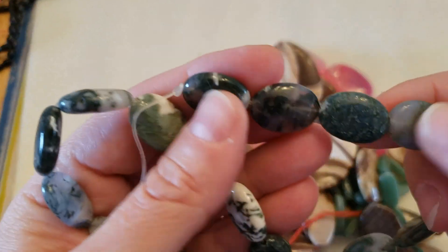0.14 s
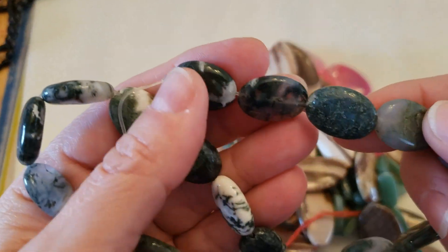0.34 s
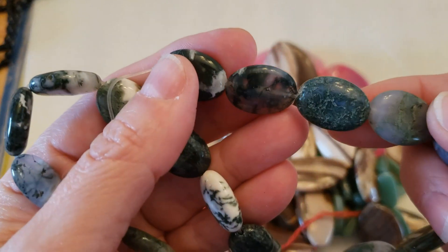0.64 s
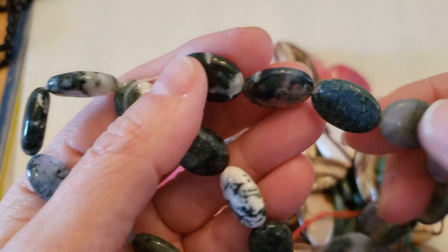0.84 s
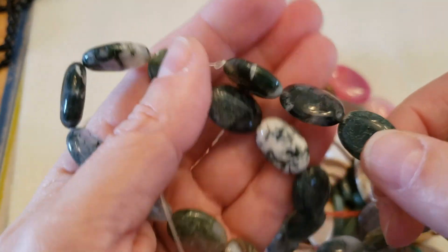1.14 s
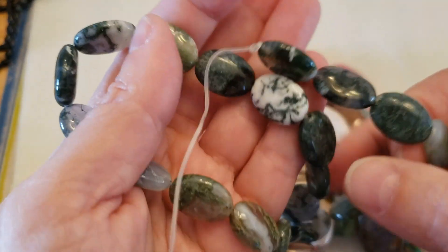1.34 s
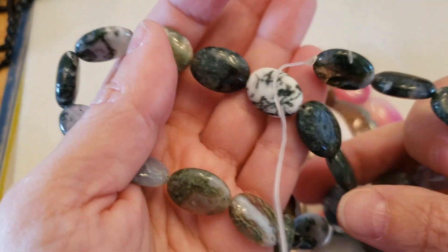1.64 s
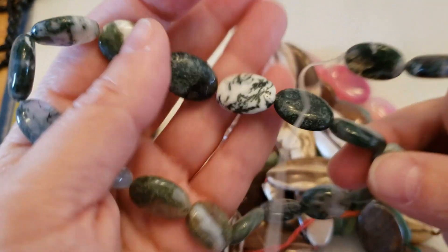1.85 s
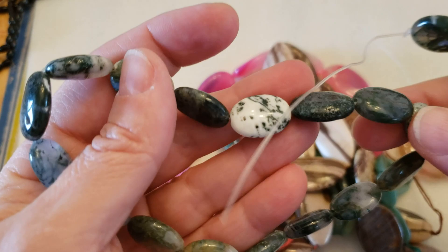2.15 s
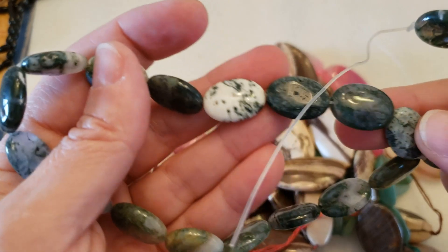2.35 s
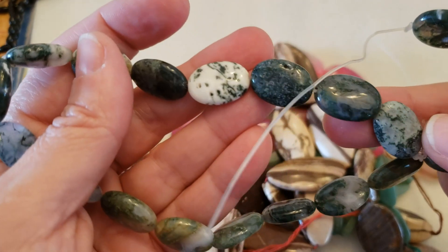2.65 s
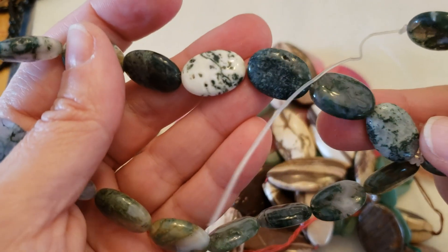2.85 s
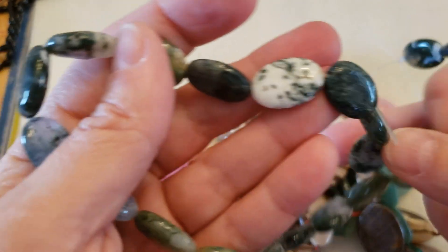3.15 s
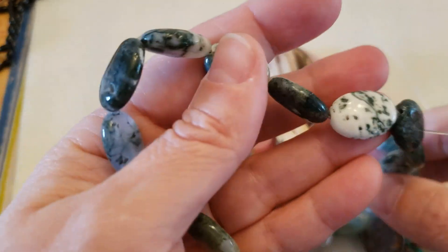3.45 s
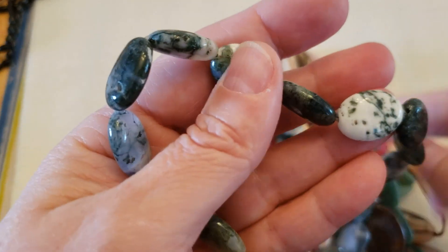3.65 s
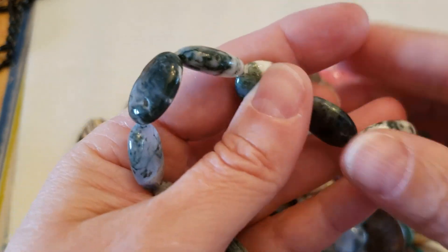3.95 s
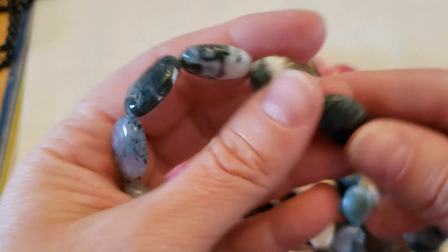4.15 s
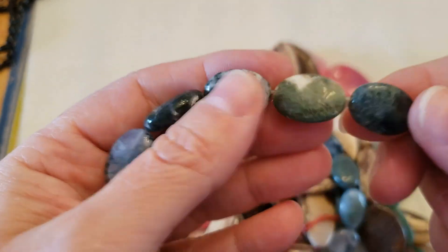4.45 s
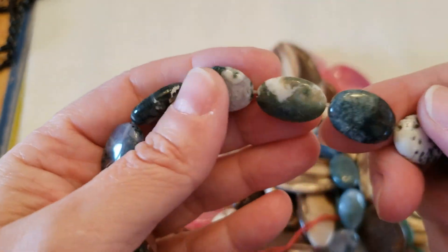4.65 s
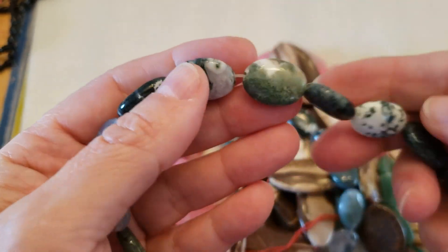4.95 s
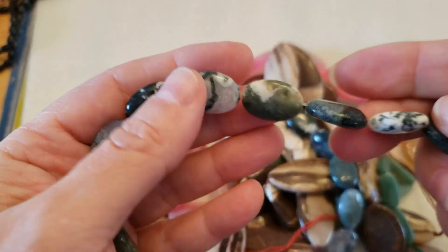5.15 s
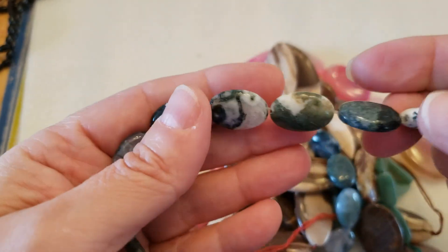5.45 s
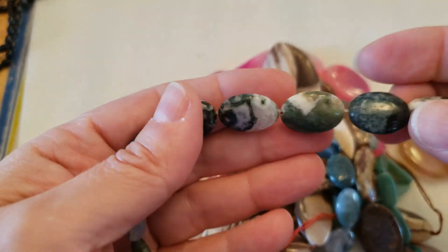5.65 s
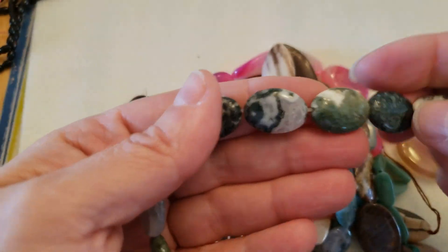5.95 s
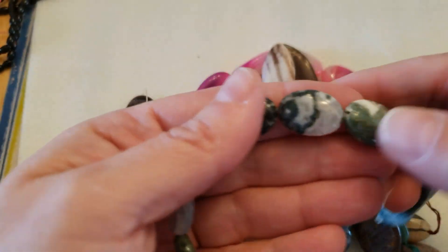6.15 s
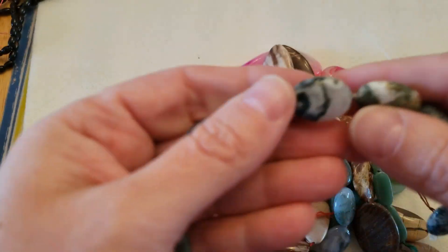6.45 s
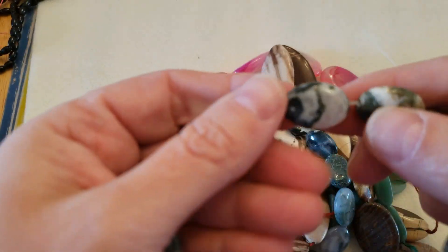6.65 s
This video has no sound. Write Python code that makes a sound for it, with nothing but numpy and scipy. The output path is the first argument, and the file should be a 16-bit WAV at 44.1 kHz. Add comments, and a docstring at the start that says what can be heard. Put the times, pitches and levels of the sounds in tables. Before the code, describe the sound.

Stone beads tick against each other in the fingers, crisp and glassy, with long near-silent gaps. A little past halfway a rapid burst of much louder clacks rattles out as beads drop onto others on a table. Lighter clicks resume, with soft grating and barely audible skin brushing. Close stereo microphone, short indoor reflections, faint wavering low rumble growing slowly.

```python
"""Polished stone beads on a strand tick against each other as hands turn it close to a phone in a small room.
Each contact is a compact impulse with its own colour and a short scattered ring; grating is a train of weak ones.
Once the loose end drops onto a heap of strands on the table: harder impulses that run on from bead to bead.
Brushing skin is swells of band noise. Behind lie a low drone like an engine outside (a wavering sine),
its slowly growing rumble, a boxy hum, a faint electrical whine (thin sines) and still air (coloured noise)."""
import sys
import numpy as np
from scipy import signal
from scipy.fft import rfft, irfft
from scipy.io import wavfile
from scipy.ndimage import uniform_filter1d

SR = 44100
rng = np.random.default_rng(int(sys.argv[2]) if len(sys.argv) > 2 else 0)


def persist_wave(psi):
    """Save psi, clipped to +-1, as 16-bit WAV."""
    counts = np.round(np.clip(psi, -1, 1) * 32767).astype(np.int16)
    wavfile.write(sys.argv[1], SR, np.atleast_2d(counts).T)


N = 299439

# bead meets bead in the hand:
# (time [s], level [dB], body below 4 kHz [dB], edge above 13 kHz [dB], left minus right [dB])
HAND_CLICKS = [(0.047, -39, -3, -30, 13), (0.902, -20.5, -6, 7.5, 5), (0.9874, -31, -2, 7, 5),
               (1.0525, -37.5, -2, -7, -1), (1.1677, -13.5, -12, 3.5, 32), (1.1715, -18.5, -10, 7.5, -34),
               (1.3359, -24.5, -10, 22.5, 15), (1.342, -22, -16, 12, -14), (1.391, -28.5, -15.5, 12.5, 5),
               (1.8119, -37.5, -9, -2, 9), (2.0086, -35, -15, -41, 0), (3.511, -26.5, -12, 8, -16),
               (3.7909, -23.5, -11, -7, -10), (3.939, -36, -2.5, 2.5, -4), (4.1163, -44, 7, -20, 5),
               (4.151, -30.5, -4, -17, 22), (4.2355, -23.5, -6.5, -4, -4), (4.246, -27.5, -6, 5, 21),
               (4.5291, -16, -4.5, -10, 7), (4.546, -20.5, -5.5, 4, 3), (4.6718, -36, -31, -4, 2),
               (4.7875, -31, -12.5, 2, -1), (5.1653, -26, -15.5, 4, -3.5), (5.2654, -32, -8.5, -24, 8),
               (5.285, -20.5, -10.5, 12, 3.5), (5.4856, -40, -8.5, -23.5, 3), (6.0967, -34, -8.5, -10, 6),
               (6.1421, -33.5, -13, -4, -1), (6.1595, -28, -11, 0, 15), (6.194, -17, -19, 3, -4),
               (6.198, -16, -17, -7, 15), (6.2091, -11, -10, 5, 4), (6.217, -24.5, -7.5, -18, 8),
               (6.3995, -34, -15, -22, 4), (6.4255, -21, -7.5, -2, -7), (6.5075, -14.5, -35, -2, -20),
               (6.5118, -26.5, -0.5, 8, 4)]
# beads rub as the strand is drawn through the fingers: (start [s], end [s], rate [ticks/s], middle level [dB])
GRATING_SPELLS = [(0.826, 0.902, 65, -43), (1.682, 1.842, 58, -54.5), (2.023, 2.101, 90, -46.5),
                  (2.956, 3.5, 14, -52.5), (4.019, 4.225, 63, -48), (4.221, 4.257, 210, -38.5),
                  (4.602, 4.856, 20, -49.5), (5.102, 5.202, 30, -50), (6.398, 6.749, 20, -49)]
# colour of a contact between beads held in the fingers: (frequency [Hz], gain [dB])
HELD_COLOUR = [(100, -18), (500, -14), (1000, -22.5), (1600, -17), (2200, -6.5), (2800, -9.5), (3700, -0.5),
               (5000, -2), (6200, -1.5), (7400, -0.5), (8600, -3), (11000, -2.5), (14500, -5),
               (16000, -1.5)]
# beads of the loose end land on the heap:
# (time [s], level [dB], body below 4 kHz [dB], edge above 13 kHz [dB])
LANDINGS = [(3.6219, -1, -8.5, 8), (3.6332, -12, -1, 11), (3.6437, 1.5, -3, 6.5), (3.6562, -5.5, -8.5, 6.5),
            (3.675, -13, -6, 0), (3.6869, -11.5, -4, 10.5), (3.6965, -1, -8.5, 4.5),
            (3.7084, -12, -10.5, 2), (3.7322, -26.5, -9, 14)]
# colour of a contact on the heap, which lies on the table: (frequency [Hz], gain [dB])
HEAP_COLOUR = [(100, -14.5), (450, -21), (700, -26), (1300, -25.5), (1800, -16), (2300, -3.5), (3000, -0.5),
               (4000, 1), (4700, -3.5), (6000, -0.5), (7400, -1), (8800, -6.5), (13000, 1.5), (16000, -3)]
# colour of the room's answer: (frequency [Hz], gain [dB])
ROOM_COLOUR = [(200, 7.5), (1500, 5), (3000, 0.8), (5000, -0.5), (7000, -5.5), (9000, -3), (12000, -4.5),
               (16000, -10)]
# skin brushes over stone and skin:
# (centre time [s], time from centre to a fall by e^2 [s], centre frequency [Hz], level [dB])
BRUSH_STROKES = [(1.053, 0.081, 4700, -79.5), (1.51, 0.18, 14000, -83), (2.04, 0.21, 5760, -81),
                 (3.228, 0.038, 14300, -68.5), (4.129, 0.26, 4500, -80.5), (4.207, 0.235, 295, -70.5),
                 (5.721, 0.056, 13420, -79), (6.468, .07, 14700, -71)]
# pitch of the distant engine: (time [s], firing rate [Hz])
FIRING_RATE = [(0, 63), (1.7, 63), (2.4, 68), (3, 71), (4.2, 74), (5, 74), (6, 72), (6.8, 70)]
# level of the engine's drone as it carries indoors: (time [s], level [dB])
DRONE_LEVEL = [(0, -75), (0.48, -64.5), (0.62, -83.5), (1.33, -74), (1.46, -63.5), (1.8, -74), (2.65, -65),
               (3.3, -61.5), (3.44, -67.5), (3.55, -56.5), (3.98, -62.5), (4.15, -54), (4.93, -68.5),
               (5.3, -65.5), (5.47, -76.5), (5.92, -53.5), (6.42, -53), (6.79, -59)]
# spectrum of the engine's rumble: (frequency [Hz], relative density [dB per Hz])
RUMBLE_SPECTRUM = [(20, -7.5), (33, -6.5), (50, -8.5), (72, 3), (100, -4), (135, -6), (175, 2), (235, -5.5),
                   (300, -8), (380, -20.5), (550, -37.5), (900, -34.5), (2000, -70.5)]
# level of the boxy hum: (time [s], level [dB])
BOOM_LEVEL = [(0, -88.5), (3.8, -82.5), (4.25, -68.5), (4.7, -76.5), (5.35, -62), (5.7, -70.5),
              (5.87, -64.5), (6.79, -67.5)]
# spectrum of the boxy hum: (frequency [Hz], relative density [dB per Hz])
BOOM_SPECTRUM = [(170, -39), (215, -12), (240, 2), (262, -14), (310, -34), (900, -88.5)]
# electrical hum and whine, high lines spaced by multiples of twice the mains rate: (frequency [Hz], level [dB])
WHINE_LINES = [(419.9, -86), (6240, -94.5), (6360, -89), (6600, -86), (6840, -88), (6960, -99.5)]
# still air of the room and microphone hiss: (frequency [Hz], relative density [dB per Hz])
AIR_SPECTRUM = [(20, 15), (35, 25), (60, 28.5), (100, 26), (200, 17.5), (400, 9.5), (700, 2), (1200, -1),
                (1800, -2), (3000, -5), (5500, -9), (6600, -1.5), (7500, -11.5), (9500, -14.5),
                (11700, -3.5), (16000, -5.5)]
# resonance of each microphone port, left then right: (centre [Hz], width [Hz], gain [dB])
PORT_RESONANCES = [(7315, 180, 12), (9550, 2900, 2.5)]

# a knocked bead rebounds at least this much weaker, with waits spread over this time
REBOUND_DB, REBOUND_S = -14.5, .016
# a landing runs on through its neighbours: mean time from bead to bead, level change at each bead
KNOCK_ON_S, KNOCK_ON_DB = .0023, -5
# the rest of the heap is jostled at least this much weaker, with waits spread over this time
JOSTLE_DB, JOSTLE_S = -11, .013
# uneven colour of every contact: spread in the bass and midrange, spacing of its humps
UNEVEN_DB, HUMP_HZ = 3, 447
# the rumble grows steadily and follows a share of the drone's swells
RUMBLE_START_DB, RUMBLE_RISE_DB_PER_S, RUMBLE_FOLLOW = -78.5, 2.5, 0.23
AIR_DB = -69.5
TOP_HZ = 15800  # upper band limit of the microphones


def hand_clicks(rebounds=2):
    """Impact and rebound: each light knock between held beads is followed by fainter knocks."""
    out = np.zeros((3, N))
    for s, db, body_db, edge_db, pan_db in HAND_CLICKS:
        add(out, s, contact(HELD_COLOUR, db, body_db, edge_db, pan_db, scatter_db=-2))
        for wait, weakness in rng.random((rebounds, 2)):
            rebound_db = db + REBOUND_DB - 8 * weakness
            rebound = contact(HELD_COLOUR, rebound_db, body_db, edge_db, pan_db, scatter_db=-2)
            add(out, s + .002 + REBOUND_S * wait, rebound)
    return out


def grating():
    """Stick-slip friction: rubbing beads give tiny dull slips at random moments."""
    out = np.zeros((3, N))
    for start, end, rate, db in GRATING_SPELLS:
        ticks = int(abs(end - start) * rate)
        for when, size, side in rng.random((ticks, 3)):
            slip_db = db + 12 * (size - .5)
            slip = contact(HELD_COLOUR, slip_db, body_db=-3.0, edge_db=-8.5, pan_db=10 * side, scatter_db=1.5)
            add(out, start + when * (end - start), slip)
    return out


def falling_strand(beads=3):
    """Momentum transfer: each hard landing runs on through the next beads and jostles those around."""
    out = np.zeros((3, N))
    for s, db, body_db, edge_db in LANDINGS:
        for k, (uneven, wait, weakness, side) in enumerate(rng.random((beads, 4))):
            knock = contact(HEAP_COLOUR, db + k * KNOCK_ON_DB, body_db, edge_db, pan_db=0, scatter_db=-4)
            add(out, s + k * KNOCK_ON_S * (1 + .3 * (uneven - .5)), knock)
            jostle_db = db + JOSTLE_DB - 8 * weakness
            jostle = contact(HEAP_COLOUR, jostle_db, body_db, edge_db, pan_db=10 * (side - .5), scatter_db=1)
            add(out, s + .003 + JOSTLE_S * wait, jostle)
    return out


def contact(spectrum, db, body_db, edge_db, pan_db, scatter_db, size=1024):
    """Hertzian impact: contact hardness colours a snap; rows are left, right and what goes out into the room."""
    # small stones ring above hearing, so hardness of contact sets the colour
    hardness = [(4000, body_db), (6500, 0), (9500, 0), (13000, edge_db)]
    snap = causal(shape_db(spectrum, size) + shape_db(hardness, size) + own_colour(size))
    # neighbouring beads, hand and table scatter it: noise partly shared by both sides, for a mild ring
    t = np.arange(size) / SR
    left_right_shared = rng.standard_normal((3, size))
    noise = left_right_shared[:2] + 0.32 * left_right_shared[2]
    scatter = rfft(noise * np.exp(-t / .0022))
    half_flattened = irfft(scatter / np.sqrt(np.abs(scatter)))
    paths = half_flattened * np.exp(-t / 0.024) * (1 - np.exp(-t / .0002))
    paths *= undb(scatter_db) / np.sqrt(np.sum(paths ** 2, axis=1, keepdims=True))
    # the straight path reaches the two ports at most one sample apart
    paths[0, 1] += 1
    paths[1, rng.choice([0, 1, 1, 2])] += 1
    pan = unit(undb(np.array([[pan_db], [-pan_db]]) / 2))
    ports = pan * signal.fftconvolve(paths, snap[None], axes=1)[:, :size]
    return undb(db) * np.vstack([ports, snap])


def own_colour(size, count=64):
    """Spectral individuality: random humps and dips [dB] for one contact, milder in the treble."""
    hz = np.fft.rfftfreq(size, 1 / SR)
    humps = np.interp(hz, HUMP_HZ * np.arange(count), rng.standard_normal(count))
    return UNEVEN_DB * humps / (1 + (hz / 9000) ** 2)


def room(x, wet_db, t60_s, early_db, early_s):
    """Reverberation: quick reflections from the table top and nearby things, then an exponential tail."""
    t = np.arange(SR // 2) / SR
    early = undb(early_db) * unit(np.exp(-t / early_s) * (t > .003))
    late = undb(wet_db) * unit(undb(-60 * t / t60_s) * (1 - np.exp(-t / .004)))
    diffuse = colour(rng.standard_normal((2, len(t))), ROOM_COLOUR)
    response = diffuse * (early + late) / np.sqrt(len(t))
    return x[:2] + signal.fftconvolve(x[2:], response, axes=1)[:, :N]


def brushing():
    """Sliding friction: skin on stone or skin gives a short swell of grainy band noise."""
    t = np.arange(N) / SR
    out = np.zeros((2, N))
    for s, length, hz, db in BRUSH_STROKES:
        band = [(hz / 4, -30), (hz / 1.5, -9), (hz, 0), (hz * 1.2, -7), (hz * 3, -25)]
        swell = np.exp(-2 * ((t - s) / length) ** 2)
        grain = undb(db + 3.9 * walk(160))
        out += stereo_noise(band, wide_hz=2980) * swell * grain
    return out


def engine():
    """Periodic firing and transmission loss: a wavering note and a growing rumble, dulled by the walls."""
    t = np.arange(N) / SR
    hz, = curve(FIRING_RATE)
    drone_db, = curve(DRONE_LEVEL)
    phase = 2 * np.pi * np.cumsum(hz * (1 + .035 * walk(14))) / SR
    drone = unit(np.sin(phase) * undb(2.2 * walk(17))) * undb(drone_db)
    swells_db = RUMBLE_FOLLOW * (drone_db - drone_db.mean())
    rumble_db = RUMBLE_START_DB + RUMBLE_RISE_DB_PER_S * t + swells_db
    rumble = stereo_noise(RUMBLE_SPECTRUM, wide_hz=2200) * undb(rumble_db + 1.8 * walk(11))
    # the drone is slightly louder on the left
    return drone * undb(np.array([[.7], [-.7]])) + rumble


def boom():
    """Narrow-band noise: a thin band of rumble stands out as a wavering hum."""
    db, = curve(BOOM_LEVEL)
    return stereo_noise(BOOM_SPECTRUM, wide_hz=2500) * undb(db)


def whine():
    """Frequency modulation: thin electrical lines of steady level waver slightly in pitch."""
    out = np.zeros((2, N))
    for hz, db in WHINE_LINES:
        for side in range(2):
            phase = 2 * np.pi * np.cumsum(hz * (1 + 0.0016 * walk(160))) / SR
            out[side] += unit(np.sin(phase)) * undb(db)
    return out


def still_air():
    """Stationary noise: the room's still air and microphone hiss at a constant level."""
    return stereo_noise(AIR_SPECTRUM, wide_hz=690) * undb(AIR_DB)


def stereo_noise(points, wide_hz):
    """Diffuse-field coherence: coloured noise, alike left and right in the bass, unrelated in the treble."""
    mid, side = rfft(rng.standard_normal((2, N)))
    hz = np.fft.rfftfreq(N, 1 / SR)
    side = side * np.sqrt((hz + 20) / (hz + wide_hz))
    left_right = irfft(np.array([mid + side, mid - side]), N)
    return unit(colour(left_right, points))


def walk(rate):
    """Random modulation: levels held 1 / rate seconds, smoothed twice, then scaled to a spread near 1."""
    k = int(SR / rate)
    held = np.repeat(rng.standard_normal(N // k + 1), k)
    smooth = uniform_filter1d(uniform_filter1d(held, k), k)
    return unit(smooth[:N])


def causal(db):
    """Minimum phase: folding the cepstrum gives the most compact causal response with this gain."""
    cepstrum = irfft(db * np.log(10) / 20)
    half = len(cepstrum) // 2
    cepstrum[1:half] *= 2
    cepstrum[half + 1:] = 0
    return irfft(np.exp(rfft(cepstrum)))


def shape_db(points, size):
    """Logarithmic frequency scale: (frequency [Hz], gain [dB]) points read at the bins of a transform."""
    hz, db = np.transpose(points)
    return np.interp(np.log(np.fft.rfftfreq(size, 1 / SR) + 1), np.log(hz), db)


def colour(x, points):
    """Linear filtering: multiply the spectrum by the gain of (frequency [Hz], gain [dB]) points."""
    size = x.shape[-1]
    return irfft(rfft(x) * undb(shape_db(points, size)), size)


def curve(rows):
    """Linear interpolation: each column of a timed table, for every sample."""
    s, *columns = np.transpose(rows)
    return [np.interp(np.arange(N) / SR, s, c) for c in columns]


def undb(db):
    """Logarithmic level: decibels to amplitude gain."""
    return 10 ** (np.asarray(db) / 20)


def unit(x):
    """Effective value: scale to rms 1."""
    return x / np.sqrt(np.mean(x ** 2))


def add(out, s, sound):
    """Superposition: mix a sound in at time s [s]."""
    i = max(int(s * SR), 0)
    part = sound[:, :max(N - i, 0)]
    out[:, i:i + part.shape[1]] += part


def scene():
    """Superposition of near and far: beads by the phone, the heap further down, the quiet room behind."""
    held = room(hand_clicks() + grating(), wet_db=-6.5, t60_s=0.35, early_db=-10, early_s=0.01)
    heap = room(falling_strand(), wet_db=-10.5, t60_s=0.19, early_db=-13.0, early_s=0.043)
    background = engine() + boom() + whine() + still_air()
    return held + heap + brushing() + background


def record(dry, size=256):
    """Port resonance and band limiting: each port adds its own peak, and the top is cut steeply."""
    hz = np.fft.rfftfreq(size, 1 / SR)
    ports = [causal(db / (1 + (2 * (hz - centre) / width) ** 2)) for centre, width, db in PORT_RESONANCES]
    heard = np.array([signal.fftconvolve(x, port)[:N] for x, port in zip(dry, ports)])
    top_cut = signal.ellip(8, .2, 70, TOP_HZ, fs=SR, output="sos")
    return signal.sosfilt(top_cut, heard)


dry = scene()
out = record(dry)
persist_wave(out)
```